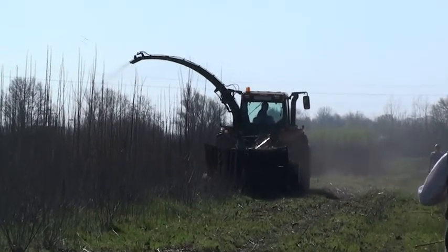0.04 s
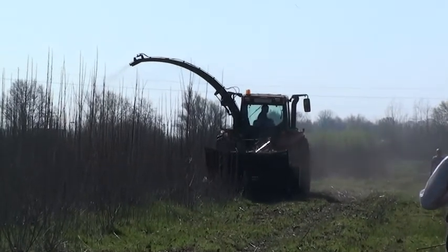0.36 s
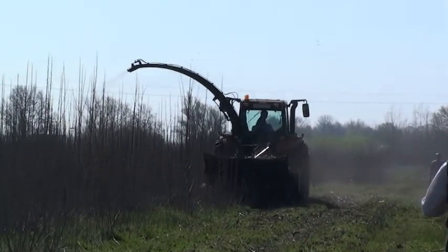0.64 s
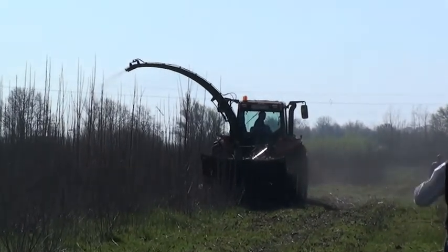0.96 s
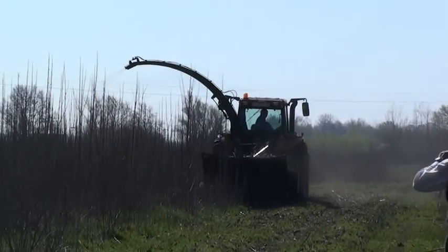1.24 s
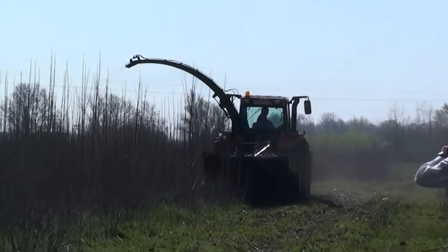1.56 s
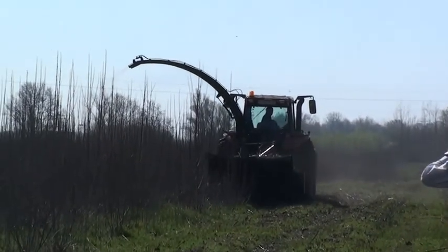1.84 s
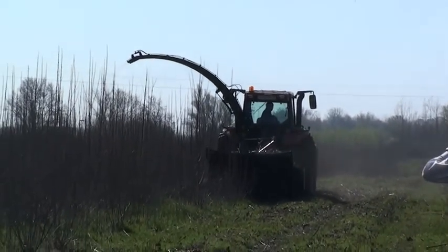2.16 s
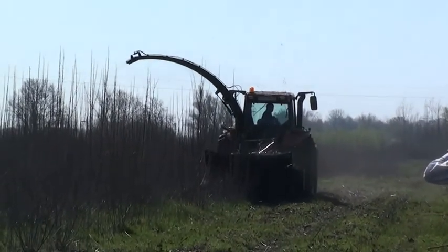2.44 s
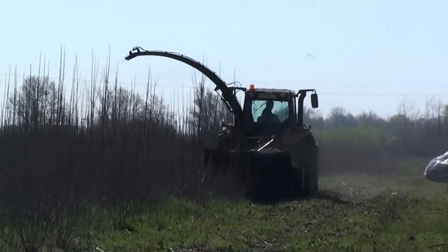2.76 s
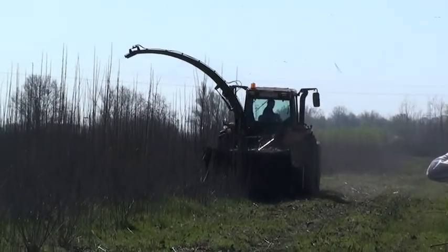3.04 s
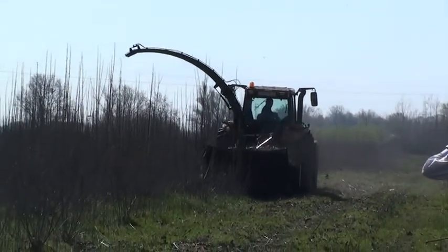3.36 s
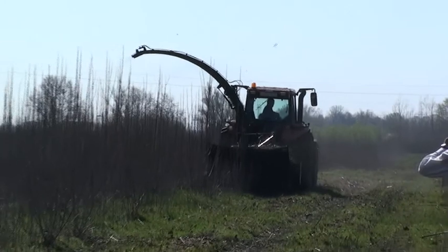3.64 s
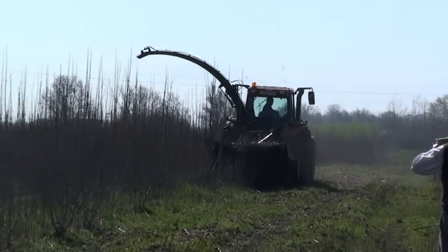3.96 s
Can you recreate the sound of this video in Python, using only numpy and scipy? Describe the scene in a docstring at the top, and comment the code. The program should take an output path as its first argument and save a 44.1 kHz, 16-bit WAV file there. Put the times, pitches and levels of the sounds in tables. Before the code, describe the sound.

A tractor-driven wood chipper works in a field, its diesel engine and spinning parts humming in front of the microphone. Twigs rustle, crack and get chopped in spurts while chips ping off metal, and the machine growls louder later on.

```python
"""Tractor and wood chipper

A tractor with a wood chipper works along a stand of thin stems in an open field.
Engine, knife drum, saw discs and blower drone at steady speeds and beat against each other.
Stems rustle in, crack and are chewed in bursts; the saw discs ring and chips zing in the spout."""
import sys
import numpy as np
from scipy import signal
from scipy.fft import rfft, irfft, next_fast_len
from scipy.io import wavfile
from scipy.ndimage import map_coordinates

SR = 44100
rng = np.random.default_rng(int(sys.argv[2]) if len(sys.argv) > 2 else 0)


def to_wav(sig):
    """Store sig (one row per channel, or 1-D mono) as 16-bit WAV at the path in sys.argv[1].

    Samples outside -1..1 are clipped; the rate is SR.
    """
    pcm = np.clip(np.atleast_2d(sig), -1, 1) * 32767
    pcm = np.round(pcm).astype(np.int16)
    wavfile.write(sys.argv[1], SR, pcm.T)  # frames by channels


N = 176400  # 4 seconds
TIME = np.arange(N) / SR


def amp(db):
    """Turn decibels into a gain."""
    return 10 ** (np.asarray(db) / 20)


def unit(x):
    """Scale a sound to an average power of 1."""
    return x / np.sqrt(np.mean(x ** 2) + 1e-20)


def along(points, hz):
    """Read between (Hz, value) points on a log frequency axis."""
    freqs, values = np.transpose(points)
    return np.interp(np.log(hz + 1), np.log(freqs + 1), values)


def noise():
    """White noise."""
    return rng.standard_normal(N)


def wobble(per_s):
    """A smooth curve through per_s random values a second."""
    return map_coordinates(rng.standard_normal(int(N * per_s / SR) + 4), [TIME * per_s])


def filtered(x, response):
    """Multiply each frequency in a sound by response(hz)."""
    size = next_fast_len(N + SR // 2)
    return irfft(rfft(x, size) * response(np.fft.rfftfreq(size, 1 / SR)), size)[..., :N]


def coloured(x, spectrum):
    """Give white sound a spectrum and keep its power."""
    return filtered(x, lambda hz: unit(amp(along(spectrum, hz))))


def tilted(x, db_per_octave):
    """Brighten or dull a sound by tipping its treble about 3000 Hz."""
    return filtered(x, lambda hz: amp(db_per_octave * np.log2(np.maximum(hz, 2000) / 3000)))


def envelope(start, attack, hold, t60):
    """Rise, hold, then fade by 60 dB in t60; all times are in seconds."""
    age = TIME - start
    return np.clip(age / attack, 0, 1) * np.exp(-np.log(1000) * np.clip((age - hold) / t60, 0, 2))


def shaft(hz, drift=0.00168):
    """The angle of a part that turns at a slightly unsteady speed."""
    speed = hz * (1 + drift * wobble(5))
    return 2 * np.pi * (np.cumsum(speed) / SR + rng.random())


def tones(angle, harmonics):
    """A turning part hums at multiples of its speed, each tone wavering in level."""
    return sum(np.sqrt(2) * amp(db + 0.5 * wobble(7.03))
               * np.sin(round(multiple) * angle + 2 * np.pi * rng.random())
               for multiple, db in harmonics)


def thicket(x, t60=0.28):
    """The standing stems scatter sound into a short echo."""
    t = TIME[:SR // 3]
    tail = rng.standard_normal(len(t)) * np.exp(-np.log(1000) * t / t60)
    return signal.fftconvolve(x, tail / np.linalg.norm(tail))[:N]


# The growl growing with the load. Each row: time in seconds, level in dB.
GROWL_LEVELS = [(0, -57), (2.4, -38.5), (3.2, -37), (4, -26.5)]
# The growl's tone colour. Each row: frequency in Hz, relative level in dB.
GROWL_SPECTRUM = [(100, -35), (220, -6), (255, 3), (290, 3), (330, 2.5), (400, -6.5), (470, -12.5),
                  (550, -28), (1200, -60)]

def housing():
    """The drum housing growls louder as the machine takes on load."""
    level_db = np.interp(TIME, *np.transpose(GROWL_LEVELS))
    return amp(level_db) * coloured(noise(), GROWL_SPECTRUM)


# The engine's hum. Each row: multiple of the firing rate, level in dB.
ENGINE_TONES = [(1, -28.5), (2, -25), (3, -33), (4, -39), (5, -45.5)]
# Exhaust rumble and diesel clatter. Each row: frequency in Hz, relative level in dB.
RUMBLE_SPECTRUM = [(20, -33), (42, -21), (60, -17), (85, -11), (125, -3), (175, 0.5), (270, -4), (305, -10),
                   (385, -9), (440, -23.5), (505, -21.5), (545, -31.5), (900, -32), (3000, -90)]
CLATTER_SPECTRUM = [(300, -15), (550, -22.5), (700, -1.5), (790, -8.5), (880, 0.5), (1020, 6), (1150, -1),
                    (1480, -4.5), (1850, 2.5), (2080, 2), (2280, -7.5), (2430, -4), (2700, -8.5),
                    (4200, -6), (7000, -24), (10000, -22), (15000, -40)]

def tractor(firing_hz=57.02):
    """The engine hums; its exhaust pulses with each firing, its clatter with every second one."""
    angle = shaft(firing_hz)
    exhaust_pulse = 1 + 0.37 * np.cos(angle)
    rumble = coloured(unit(noise() * exhaust_pulse), RUMBLE_SPECTRUM)
    clatter_pulse = 1 + 0.07 * np.cos(angle / 2)
    clatter = coloured(unit(noise() * clatter_pulse * amp(0.63 * wobble(15))), CLATTER_SPECTRUM)
    return tones(angle, ENGINE_TONES) + amp(-23.5) * rumble + amp(-31.5) * clatter


# The hum of each spinning part. Each row: multiple of its speed, level in dB.
DRUM_TONES = [(1, -35.5), (2, -28.5), (3, -29), (4, -34), (5, -58), (7, -48.5)]
SAW_TONES = [(2, -26), (3, -39), (4, -29.5)]
BLOWER_TONES = [(1, -27.5), (2, -43), (3, -40)]
# The whine of the gears. Each row: frequency in Hz, level in dB.
GEAR_TONES = [(829, -50), (957, -47.5), (1003, -51.5), (1020, -47), (1208, -63)]
DRUM_HZ, SAW_HZ, BLOWER_HZ = 63.78, 70.9, 93.75

def rotors():
    """Knife drum, saw discs and blower hum as they spin, and their gears whine."""
    parts = [(DRUM_HZ, DRUM_TONES), (SAW_HZ, SAW_TONES), (BLOWER_HZ, BLOWER_TONES)]
    hum = sum(tones(shaft(hz), harmonics) for hz, harmonics in parts)
    whine = sum(amp(db) * unit(amp(3.7 * wobble(13)) * np.sin(shaft(hz, drift=0.00299)))
                for hz, db in GEAR_TONES)
    return hum + whine


def splinters(per_s, spread_db, clump_db):
    """Wood breaks in many tiny clicks of uneven size, which come in clumps."""
    clicks = (rng.random(N) < per_s / SR) * np.sign(noise())
    size_db = spread_db * np.clip(noise(), -2, 1.5)
    swell_db = clump_db * np.clip(wobble(130), -2, 1.5)
    return unit(clicks * amp(size_db + swell_db))


# The flow of stems and chips. Each row: time in seconds, relative level in dB.
FEED_LEVELS = [(0, -30), (.1, -36), (.35, -31.5), (.44, -34), (.52, -29.5), (.62, -31.5), (.77, -31),
               (.83, -24), (.9, -26.5), (1.0, -36.5), (1.11, -30), (1.18, -38.5), (1.42, -39.5),
               (1.63, -33.5), (1.75, -40.5), (2.0, -35.5), (2.14, -38), (2.24, -35), (2.42, -38.5),
               (2.45, -31), (2.51, -29), (2.65, -30.5), (2.71, -35.5), (2.85, -32), (2.93, -35.5),
               (3.03, -38.5), (3.109, -33.5), (3.2, -35.5), (3.32, -30.5), (3.44, -33), (3.62, -34.5),
               (3.76, -28), (3.85, -32.5), (3.94, -24), (4, -26.5)]
# The rustle's tone colour. Each row: frequency in Hz, relative level in dB.
RUSTLE_SPECTRUM = [(500, -23), (1500, -1.5), (3000, 3.5), (4300, 0.5), (5200, 1), (6200, 0.5), (7100, -2.5),
                   (9000, -1.5), (10500, -6), (12500, -14.5), (15000, -33)]

def feed(gain_db=2.5, ticks_per_s=41, tick_t60=0.007):
    """Twigs and chips rustle through the machine, with sharper ticks among them."""
    level_db = np.interp(TIME, *np.transpose(FEED_LEVELS)) + 0.6 * wobble(35)
    grains = splinters(per_s=4500, spread_db=3.5, clump_db=2.5)
    hits = (rng.random(N) < ticks_per_s / SR) * amp(rng.uniform(1, 9.6, N))
    decay = np.exp(-np.log(1000) / (tick_t60 * SR))
    ticks = signal.lfilter([1], [1, -decay], hits) * noise()  # each hit fades as a puff of noise
    return coloured((grains + ticks) * amp(level_db + gain_db), RUSTLE_SPECTRUM)


# Chips hitting the spout. Each row: start in seconds, level in dB.
CHIP_HITS = [(.001, -17.5), (0.167, -25), (.277, -24), (0.561, -23), (0.914, -17.5), (.952, -24),
             (1.407, -27.5), (1.69, -28), (1.83, -28.5), (1.964, -27.5), (2.21, -31), (2.467, -27),
             (2.498, -23), (3.06, -28.5), (3.099, -26.5), (3.522, -25), (3.583, -24.5), (3.665, -25.5),
             (3.718, -22.5), (3.996, -16.5)]
# A zing's tone colour. Each row: frequency in Hz, relative level in dB.
ZING_SPECTRUM = [(1500, -15), (3500, -4), (4400, 2), (5100, -1.5), (5800, 6), (6400, -0.5), (7200, -4.5),
                 (9000, -7), (14000, -51)]

def zings(spread_octaves=0.08):
    """Chips glance off the steel spout in bright scrapes, each with its own pitch."""
    out = np.zeros(N)
    for start, db in CHIP_HITS:
        pitch = 2 ** rng.uniform(-spread_octaves, spread_octaves)
        scrape = coloured(noise(), [(hz * pitch, level) for hz, level in ZING_SPECTRUM])
        out += amp(db) * envelope(start, attack=0.0012, hold=0.006, t60=0.055) * scrape
    return out


# Saw discs biting into stems. Each row: start in seconds, hold of the ring in seconds,
# level in dB, extra level of the knock in dB.
SAW_BITES = [(0.841, .07, -31, -3), (0.893, 0.034, -32, -4), (2.579, 0.056, -35, -9),
             (2.855, .06, -35.5, -9), (3.32, 0.016, -32.5, 1), (3.754, 0.029, -23.5, -1),
             (3.923, 0.04, -31.5, 4)]
# A tooth's hollow knock. Each row: frequency in Hz, relative level in dB.
KNOCK_SPECTRUM = [(600, -33), (850, -7), (970, -1), (1080, -7), (1450, -24), (3000, -60)]
# A disc's ringing tones. Each row: frequency in Hz, relative level in dB, seconds to fade 60 dB.
DISC_TONES = [(870, -10, .55), (940, -11, .45), (1019, -3.5, .65), (1134, -13, .29), (1210, -6, .22)]

def saw_discs(attack=0.002):
    """A tooth knocks on the stem and the disc rings on, its tones wavering as it turns."""
    knocks = sum(amp(db + knock_db) * envelope(start, attack, hold=0.008, t60=0.07)
                 for start, _, db, knock_db in SAW_BITES)
    out = knocks * coloured(noise(), KNOCK_SPECTRUM)
    for hz, tone_db, t60 in DISC_TONES:
        gain = np.sqrt(2) * amp(tone_db + 2 * wobble(60))
        phase_waver = 0.8 * wobble(60)
        for start, hold, db, _ in SAW_BITES:
            ring = np.sin(2 * np.pi * (hz * TIME + rng.random()) + phase_waver)
            out += amp(db) * gain * envelope(start, attack, hold, t60) * ring
    return out


# Knives chewing stems. Each row: start in seconds, hold in seconds, level in dB,
# brightness in dB per octave.
KNIFE_CHOPS = [(0.162, 0.015, -23, 2.5), (0.622, 0.0077, -20.5, -0.5), (0.785, .012, -27.5, 6),
               (.808, .015, -28, 1), (0.838, 0.095, -26.5, 0), (.951, .006, -24, -1),
               (1.06, 0.013, -28.5, 0), (1.108, .012, -26, 2), (1.764, 0.0073, -28.5, 3),
               (2.501, .008, -28, -2), (2.528, .006, -23.5, 5), (2.557, .005, -28, -4),
               (2.588, 0.043, -23, -0.5), (2.742, 0.011, -28, -5), (2.852, 0.025, -27.5, -4),
               (3.18, .003, -25, 4), (3.236, .003, -25, 3.5), (3.287, .025, -27, -2),
               (3.3225, .006, -17, -3), (3.354, .005, -24, 2), (3.752, 0.028, -21, 0.5),
               (3.914, 0.057, -23.5, -1), (3.945, .006, -22.5, 2)]
# The crunch's tone colour. Each row: frequency in Hz, relative level in dB.
CRUNCH_SPECTRUM = [(60, -35), (200, -10), (370, 3), (550, -20), (1000, -9), (1400, -10), (1850, 4.5),
                   (3000, 0.5), (4500, -5), (7000, -13), (10000, -25), (15000, -50)]

def chops():
    """Each thick stem crunches, pulsing with the knives."""
    crunch = np.zeros(N)
    for start, hold, db, brightness in KNIFE_CHOPS:
        burst = amp(db) * envelope(start, attack=0.001, hold=hold, t60=0.1) * noise()
        crunch += tilted(burst, brightness)
    knife_pulse = 1 + 0.33 * np.cos(shaft(DRUM_HZ))
    roughness = amp(1.5 * wobble(500))
    return coloured(unit(knife_pulse * roughness) * crunch, CRUNCH_SPECTRUM)


# Dry stems snapping. Each row: start in seconds, relative level in dB,
# level of the tail against the crack in dB, brightness in dB per octave.
STEM_SNAPS = [(.1662, -5.5, -13, -1), (.5435, -14, -12, 0), (0.7387, -8, -20, -1.5), (.7825, -14, -14, 0),
              (.8095, -12, -8, 1), (.838, -12, -8, 0), (1.2565, -15.5, -13, -1.5), (1.3635, -9, -21, 1.5),
              (1.4831, -17, -15, 1.5), (1.617, -15.5, -7, 1.5), (2.0215, -14, -16, 0), (2.049, -16, -8, 3),
              (2.214, -14, -13, -1), (2.2532, -17, -12, 3), (2.4664, -5.5, -19, -1), (2.562, -10.5, -9, 1),
              (2.589, -12, -9, 0), (2.617, -10, -9, -1), (2.8085, -10, -9, 0), (3.18, -13, -11, -5),
              (3.208, -15, -12, -5), (3.254, -12.5, -13, -1.5), (3.2879, -5.5, -16, -2.5),
              (3.397, -17, -17, 1), (3.411, -14, -18, -1), (3.4918, -5, -26, -2), (3.738, -9, -11, -2),
              (3.9745, -8, -15, -3), (3.992, -6.5, -11, 0.5)]
# The crack's tone colour. Each row: frequency in Hz, relative level in dB.
CRACK_SPECTRUM = [(500, -23), (1500, -9), (3500, 0), (6000, 6), (10000, 1), (12500, -13), (15500, -33)]

def snaps(gain_db=-6.2, hold=0.0005):
    """A dry stem breaks with a sharp crack and a short tail of splitting fibres."""
    fibres = np.sign(noise())
    out = np.zeros(N)
    for start, db, tail_db, brightness in STEM_SNAPS:
        crack = envelope(start, attack=1 / SR, hold=hold, t60=0.003)
        tail = amp(tail_db) * envelope(start + hold, attack=hold, hold=0, t60=0.035)
        out += tilted(amp(db + gain_db) * (crack + tail) * fibres, brightness)
    return coloured(out, CRACK_SPECTRUM)


# Echo arriving from the sides. Each row: frequency in Hz, gain in dB.
SIDE_ECHO = [(60, -13), (250, -29), (550, 2), (1000, -22), (4500, -15), (9000, -38)]
# How much louder the left ear is than the right. Each row: frequency in Hz, difference in dB.
LEFT_LOUDER = [(60, -1.5), (87, -1.5), (130, -1), (180, 3), (260, 2), (380, 1.0), (550, -2), (790, 11),
               (1140, -0.5), (1650, 3), (2380, -1.5), (3440, -1.0), (4970, 0), (7180, 1.5), (10400, -1.5),
               (15000, -1)]
# How far the left ear is ahead of the right. Each row: frequency in Hz, phase in radians.
LEFT_AHEAD = [(0, 0.6), (340, 0.41), (600, 0.95), (1030, -0.59), (1550, 0.37), (2150, -0.61), (2670, -0.11),
              (4740, 0.095), (5000, -0.26), (5860, 0.47), (6720, 0.0), (15200, -0.0)]

def scene():
    """The machine stands almost straight ahead, widened a little by echo from the stems."""
    cutting = feed() + chops() + snaps() + zings() + saw_discs()
    machine = tractor() + rotors() + housing() + cutting
    side = filtered(thicket(machine), lambda hz: amp(along(SIDE_ECHO, hz)))
    middle = machine + amp(-11) * thicket(cutting)
    stereo = np.array([middle + side, middle - side])
    ears = np.array([[0.5], [-0.5]])  # left and right each take half of the difference
    return filtered(stereo, lambda hz: amp(ears * along(LEFT_LOUDER, hz))
                    * np.exp(1j * ears * along(LEFT_AHEAD, hz)))


def record(dry, top_hz=15400):
    """Cut away the very highest treble."""
    return filtered(dry, lambda hz: hz < top_hz)


dry = scene()
out = record(dry)
to_wav(out)
```